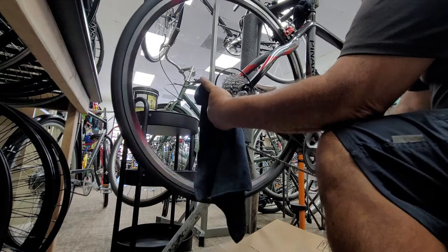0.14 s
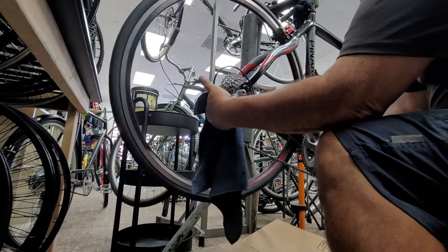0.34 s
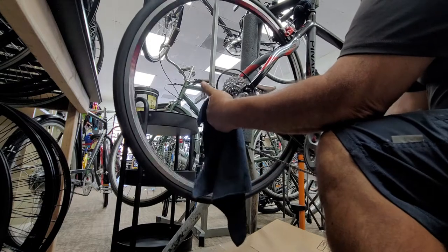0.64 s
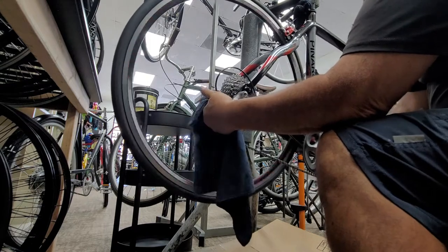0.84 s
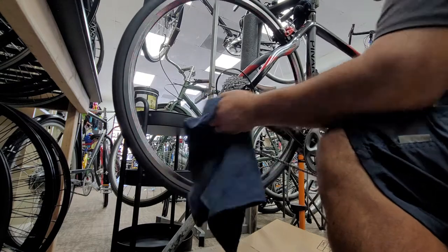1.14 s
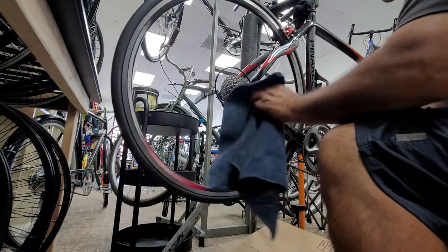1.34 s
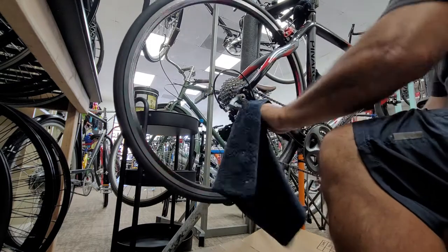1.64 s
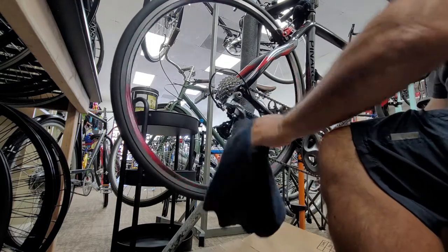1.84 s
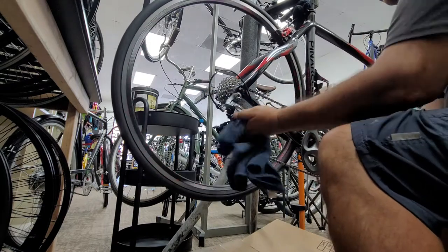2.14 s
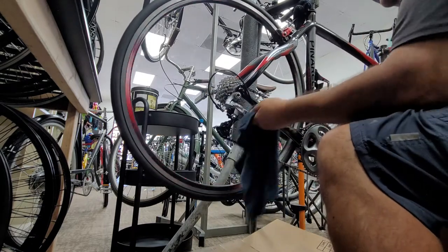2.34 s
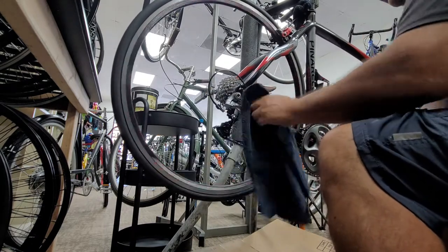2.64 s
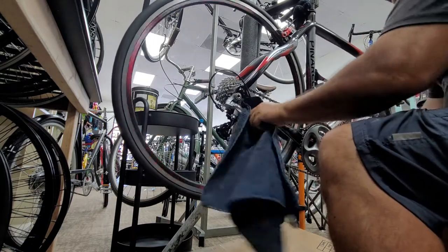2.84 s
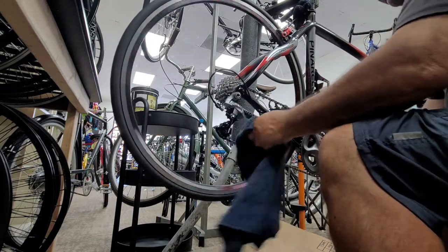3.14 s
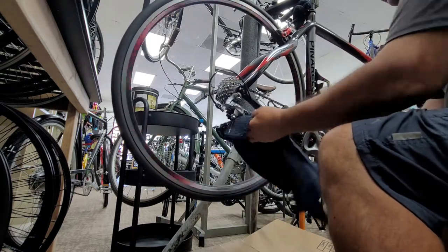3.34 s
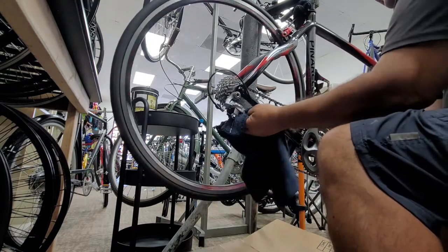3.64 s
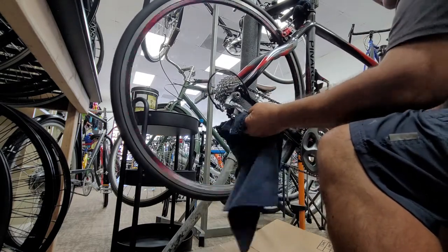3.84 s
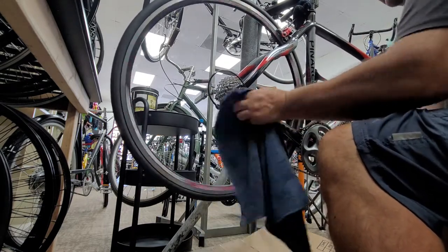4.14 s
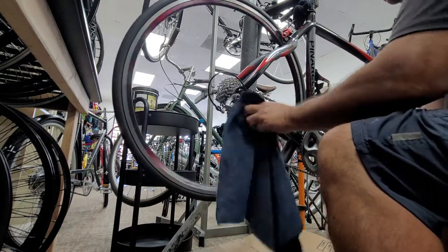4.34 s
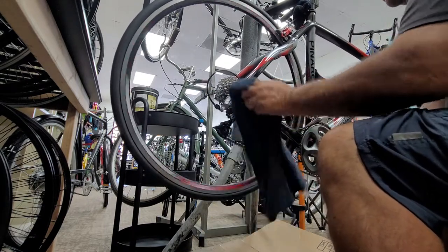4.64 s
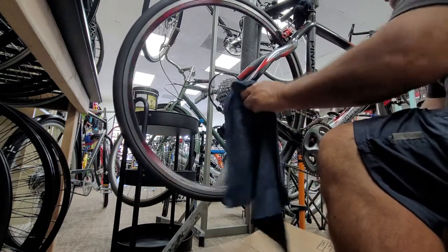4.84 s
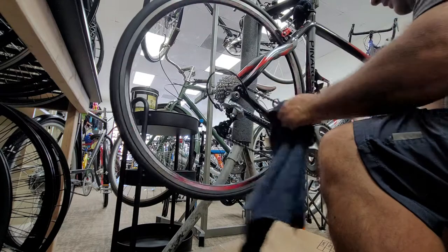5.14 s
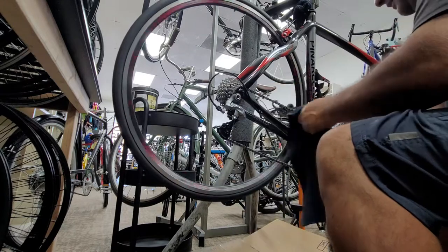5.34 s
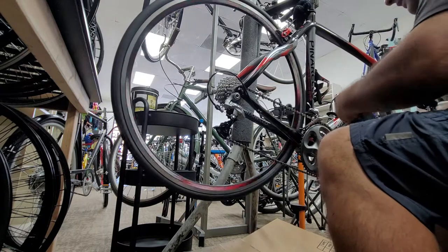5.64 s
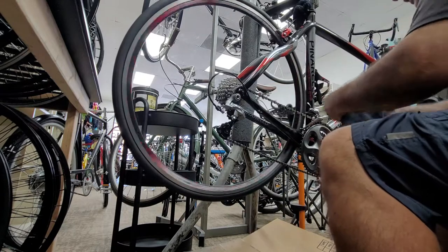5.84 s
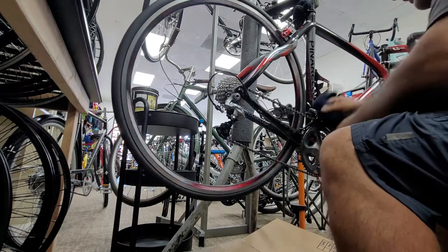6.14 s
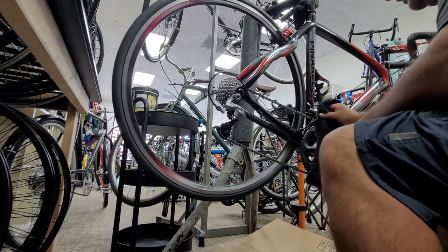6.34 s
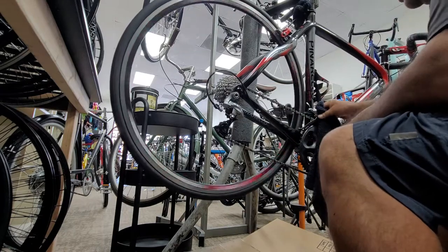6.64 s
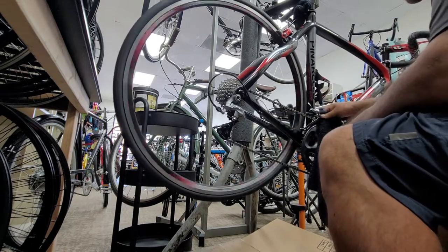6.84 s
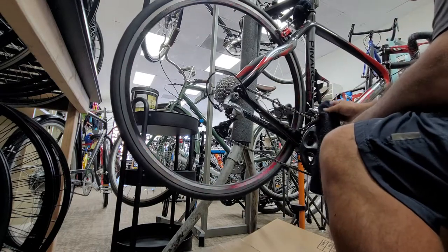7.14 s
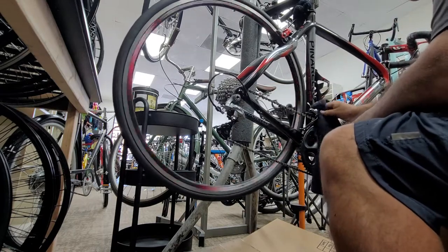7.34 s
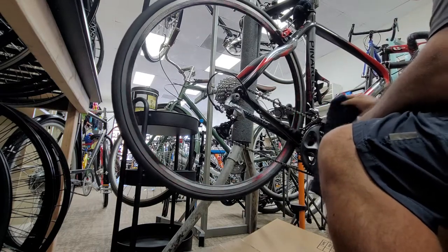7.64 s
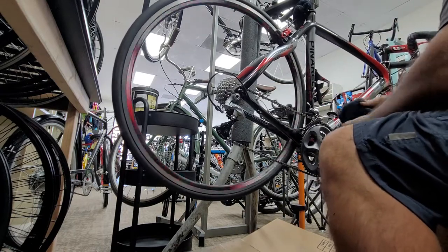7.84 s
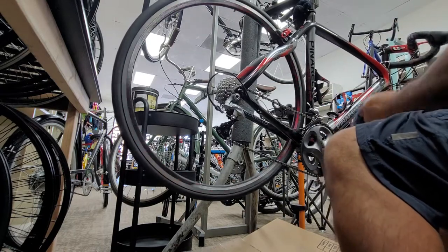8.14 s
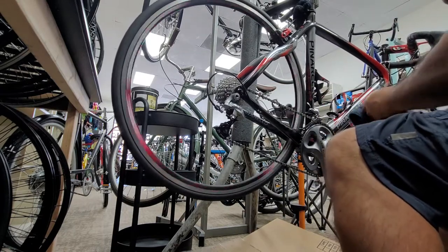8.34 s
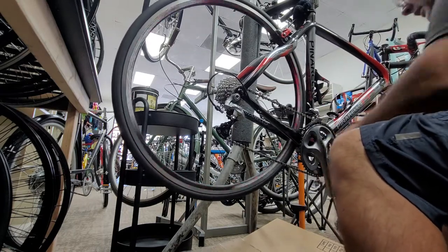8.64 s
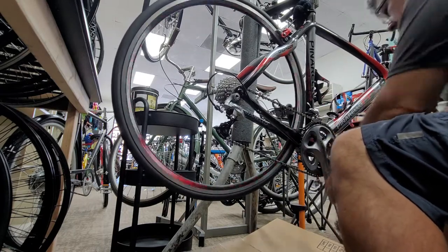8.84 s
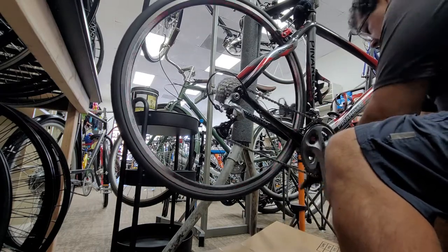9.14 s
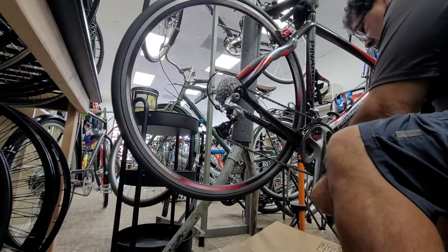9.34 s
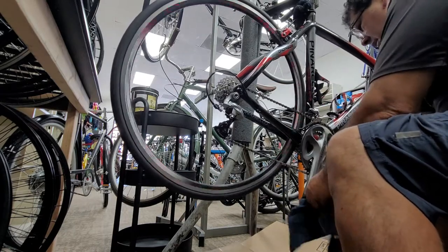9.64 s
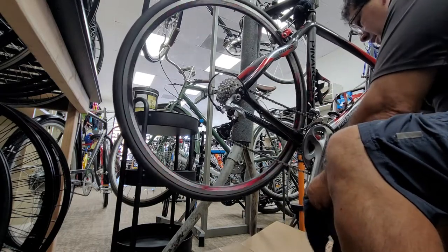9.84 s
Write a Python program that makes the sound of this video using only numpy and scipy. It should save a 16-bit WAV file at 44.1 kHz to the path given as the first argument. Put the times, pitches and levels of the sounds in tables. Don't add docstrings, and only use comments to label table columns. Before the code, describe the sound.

Close, bright ticking buzz of a coasting rear wheel, about sixty clicks a second, slowing slightly, with faint cloth scuffs and low room rumble.

```python
import sys
import numpy as np
from scipy import signal
from scipy.fft import rfft, irfft
from scipy.io import wavfile
from scipy.ndimage import uniform_filter1d

SR = 44100
rng = np.random.default_rng(int(sys.argv[2]) if len(sys.argv) > 2 else 0)


def file_out(sig):
    cols = np.atleast_2d(sig).T
    lim = np.clip(cols, -1, 1)
    pcm = np.round(lim * 32767).astype(np.int16)
    wavfile.write(sys.argv[1], SR, pcm)


def how_loud(loudness_db):
    steps = np.asarray(loudness_db, float) / 20
    return 10 ** steps


N = 440118

# (time [s], peak level [dB], drone pitch [Hz], spread [s])
VEHICLES = [(0, -53.5, 37, .2), (.95, -41, 38.4, 0.074), (1.5, -46, 40.44, 0.46), (2.0, -38, 43, 0.19),
            (2.64, -43, 45, 0.13), (3.5, -52, 40.3, 0.33), (4.45, -53, 41, 0.31), (6.15, -57, 35.1, 0.33),
            (7.34, -56, 40, .08), (8.3, -50, 45.3, .2), (9.0, -53, 41, 0.14), (9.67, -56, 42.3, 0.24)]
LULL_DB, LULL_HZ = -60, 40
# (frequency [Hz], level [dB per Hz])
AIR_SPECTRUM = [(12, -40), (20, 1), (48, -7.5), (80, 4), (97, -5), (128, -9.5), (147, -13.5), (175, -19.5),
                (210, -15.5), (247, -23.5), (309, -19), (490, -27.5), (700, -39.5), (910, -49),
                (1540, -120)]
# (frequency [Hz], level [dB per Hz])
HISS_SPECTRUM = [(25, -10.0), (45, -34), (600, -23), (1500, -32.5), (16000, -30)]
# (frequency [Hz], side minus mid [dB])
AIR_WIDTH = [(60, -16), (110, -12), (200, -7.5), (380, -0.5), (700, -2), (1290, 0), (2380, -11), (4400, -2),
             (8120, 0), (15000, 0)]
# (time [s], rise [dB], spread [s])
VENT_GUSTS = [(.4, 2.5, 0.5), (2.7, 1, 0.4), (3.08, 6, .08), (3.56, 6, 0.13), (4.2, 5, .12),
              (4.8, 1.5, 0.12), (5.8, 2.5, 0.37), (7.05, 6, 0.17), (7.6, 3.5, 0.078), (8.3, 0.5, .1),
              (8.8, 4, 0.11)]
AIR_DB, CALM_DB = -46, -1
MAINS_HZ, MAINS_DB = 121.9, -56

# (time [s], peak level [dB], contact [s])
STOOL_BLOWS = [
    (5.559, -56, .0004),
    (5.576, -31, 0.0016),
    (8.531, -46, 0.0011),
]
# (frequency [Hz], level [dB], decay time T60 [s])
STOOL_MODES = [(195.5, -2, 0.67), (261, -3, 0.26), (390, -2, 0.23), (462, -3, 0.1), (640, -10, 0.074),
               (836, -10, .07), (1152, 3, .06), (2000, -14, .04)]
# (time [s], peak level [dB], centre [Hz], width [Hz], length [s])
SCUFF_EVENTS = [(.43, -48.5, 523, 68, 0.15), (0.424, -48, 1430, 160, 0.066), (.45, -46.5, 920, 550, 0.056),
                (4.2, -47, 780, 150, 0.14), (4.021, -48, 474, 150, 0.11), (4.5, -52, 650, 230, 0.084),
                (4.39, -49, 480, 130, 0.097), (5.558, -36, 950, 1260, 0.068), (5.591, -43, 260, 48, .14),
                (5.577, -48.5, 398, 200, 0.13), (3, -62, 54, 4, 1.3), (2.5, -54, 140, 2.8, 1.2),
                (3.189, -55, 745, 15, 0.44), (9.4, -53, 370, 230, 0.068), (9.921, -49, 590, 790, 0.17)]
ROOM_T60_S, ROOM_DB = 0.28, -6
PORT_LAG = 18

# (time [s], travel [teeth], spread [s])
CRANK_NUDGES = [(0.034, -0.279, 0.0524), (0.2574, 3.896, 0.0813), (0.3417, 2.969, 0.0471),
                (0.392, -0.687, 0.1035), (0.869, -3.858, 0.1164), (1.1824, -3.692, 0.0941),
                (1.9323, -1.916, 0.108), (1.9865, 2.421, 0.1617), (2.4373, 0.234, 0.0268),
                (5.0286, 1.469, 0.1933), (5.269, 0.871, 0.0564), (5.4942, -0.51, 0.0322),
                (9.228, 1.972, 0.0464), (9.3123, 4.705, 0.0634), (9.4254, 3.757, 0.1048),
                (9.6325, -2.844, 0.0489), (9.6646, 4.654, 0.0788)]
TEETH = 30
START_TEETH, COAST_TEETH_S = -.2185, 67.3316
DRAG_TEETH_S2, EASE_TEETH_S3 = 1.4739, .0248
# (near 2.8 kHz [dB], near 4.5 kHz [dB], above 6 kHz [dB])
PLAIN_TOOTH_DB = (.1, 1.23, 0.45)
# (tooth [index], near 2.8 kHz [dB], near 4.5 kHz [dB])
WORN_TEETH = [(0, 3.5, -3.3), (1, -2, 2), (2, -4, -3.7), (4, 1, -0.3), (5, 2, 1), (6, 1.8, -5),
              (7, -1.7, 5), (8, -5.5, 1.2), (9, 0.4, 0.1), (10, -6, 4.2), (11, -5.5, -7), (14, -1, 4.5),
              (15, -2.5, 2.5), (18, -0.5, -1), (22, -0.5, 1.5), (23, -4.5, 2.5), (24, 0, 2.5), (29, 4, 2.3)]
# (near 2.8 kHz [dB], near 4.5 kHz [dB], above 6 kHz [dB])
SEATING_DB = (1.4, 1.6, 0.6)
DRIFT_TURNS = 32
# (time [s], level [dB])
BLOW_STRENGTH = [(0, 0.4), (1.2, 0.1), (2.5, 0.9), (5.2, 0.6), (5.6, 1.4), (9.1, 1.4), (9.98, 1.9)]
# (frequency [Hz], level [dB per Hz])
WHEEL_BED = [(320, -100), (550, -41), (670, -37), (749, -8.5), (1370, -22.5), (2060, -6.5), (2270, -8),
             (2770, 2.5), (3510, -8.5), (4280, -7.5), (6160, -8), (9530, -6.5), (11800, -10.5), (14900, -2),
             (15800, -23)]
# (frequency [Hz], width [Hz], level [dB])
WHEEL_MODES = [(735, 35, -14.5), (800, 29, -21), (899, 65, -9), (1171, 21, -18), (1538, 250, -17),
               (1957, 48, -8.5), (2132, 50, -5), (2357, 33, -4), (2480, 58, -12), (2670, 83, -3.5),
               (2814, 31, -0.5), (3044, 204, -5.5), (3860, 140, -10.5), (4300, 260, -11.5),
               (4930, 210, -14), (7236, 130, -10), (8250, 110, -10), (9520, 460, -10), (10650, 470, -10.5),
               (14770, 400, -7), (15700, 240, -7)]
# (frequency [Hz], left minus right [dB])
PORT_FACING = [(60, 10), (110, 9), (200, 4), (380, -1), (700, -6), (1290, -3.5), (2380, 0.5), (4400, 0.5),
               (8120, 3.0), (15000, 6)]
FRAME_LATE_S, RIM_LATE_S = .0052, 0.00157
RIM_HZ, RIM_WIDTH_HZ, RIM_DB, RIM_SWING_DB, RIM_FACES_TOOTH = 2110, 200, 18.5, 5.5, 1.2
SNAP_S, SNAP_DB = 0.00016, 2.5


def on_log(hz, table):
    points = np.array(table, float)
    return np.interp(np.log(np.maximum(hz, 1)), np.log(points[:, 0]), points[:, 1])


def level(x, db):
    return x * how_loud(db) / np.sqrt(np.mean(x ** 2))


def bell(s, spread):
    return np.exp(-.5 * ((np.arange(N) / SR - s) / spread) ** 2)


def shaped(gain_db):
    gain = how_loud(gain_db(np.fft.rfftfreq(N, 1 / SR)))
    return irfft(rfft(rng.standard_normal(N)) * gain, N)


def causal(gain):
    cepstrum = irfft(np.log(gain))
    cepstrum[1:len(gain) - 1] *= 2
    cepstrum[len(gain):] = 0
    return irfft(np.exp(rfft(cepstrum)))


def through(x, response):
    return signal.fftconvolve(x, response, axes=-1)[..., :N]


def ports(noise, shared):
    common = noise[..., 2, :]
    both = np.stack([common, np.roll(common, PORT_LAG, axis=-1)], axis=-2)
    return np.sqrt(1 - shared) * noise[..., :2, :] + np.sqrt(shared) * both


def traffic():
    lull = how_loud(LULL_DB) ** 2
    power = [how_loud(db) ** 2 * bell(s, spread) ** 2 for s, db, _, spread in VEHICLES]
    total = lull + sum(power)
    hz = (lull * LULL_HZ + sum(p * row[2] for p, row in zip(power, VEHICLES))) / total
    return hz, np.sqrt(total)


def workshop():
    def air_db(hz):
        return np.maximum(on_log(hz, AIR_SPECTRUM), on_log(hz, HISS_SPECTRUM))

    mid = shaped(air_db)
    side = shaped(lambda hz: air_db(hz) + np.minimum(on_log(hz, AIR_WIDTH), 0))
    deep = signal.sosfiltfilt(signal.butter(2, [58, 112], "bandpass", fs=SR, output="sos"), mid)
    swell_db = CALM_DB + sum(db * bell(s, spread) for s, db, spread in VENT_GUSTS)
    mid = mid + deep * (how_loud(swell_db) - 1)
    air = level(np.array([mid + side, mid - side]), AIR_DB)
    mains = how_loud(MAINS_DB) * np.sqrt(2) * np.sin(2 * np.pi * MAINS_HZ * np.arange(N) / SR)
    hz, size = traffic()
    flutter = 1 + 0.34 * level(shaped(lambda f: -20 * np.log10(1 + (f / 2.1) ** 2)), 0)
    drone = size * how_loud(1.0) * flutter * np.sin(2 * np.pi * np.cumsum(hz) / SR)
    return air + mains + drone * how_loud(np.array([[-1.5], [1.5]]))


def stool():
    t = np.arange(SR // 2) / SR
    ring = np.zeros(len(t))
    for hz, db, t60 in STOOL_MODES:
        ring += how_loud(db) * np.sin(2 * np.pi * hz * t) * np.exp(-np.log(1000) * t / t60)
    push = np.zeros((2, N))
    for s, db, contact in STOOL_BLOWS:
        blow = np.hanning(int(contact * SR) + 3)
        at = int(s * SR)
        push[:, at:at + len(blow)] += np.outer(how_loud(db + np.array([-5.0, -3.0])), blow / blow.sum())
    return through(push, ring[None])


def scuffs():
    out = np.zeros((2, N))
    for s, db, hz, width, length in SCUFF_EVENTS:
        size = int(2 * length * SR)
        edges = [max(hz - width / 2, 50), hz + width / 2]
        band = signal.butter(2, edges, "bandpass", fs=SR, output="sos")
        grit = signal.sosfilt(band, rng.standard_normal((2, size)))
        u = np.arange(size) / (length * SR)
        swell = level(grit, db) * 4 * u * np.exp(-4 * u) * np.e
        at = int(s * SR)
        out[:, at:at + size] += swell[:, :N - at]
    return out


def room_echo():
    t = np.arange(3 * SR // 8) / SR
    decay = np.exp(-np.log(1000) * t / ROOM_T60_S) * (t > .006)
    tail = ports(rng.standard_normal((3, len(t))), 0.23) * decay
    tail = signal.lfilter([1], [1, -.4], tail)
    return tail * how_loud(ROOM_DB) / np.sqrt(np.sum(tail ** 2, axis=1, keepdims=True))


def click_times():
    t = np.arange(N) / SR
    teeth = START_TEETH + COAST_TEETH_S * t - DRAG_TEETH_S2 * t ** 2 / 2 + EASE_TEETH_S3 * t ** 3 / 6
    for s, moved, spread in CRANK_NUDGES:
        teeth = teeth - moved * (1 + np.tanh((t - s) / spread)) / 2
    return np.interp(np.arange(int(teeth[-1]) + 1), teeth, t)


def wear_db(count):
    db = np.tile(np.array(PLAIN_TOOTH_DB, float), (TEETH, 1))
    worn = np.array(WORN_TEETH)
    db[np.round(worn[:, 0]).astype(int), :2] += 1.13 * worn[:, 1:]
    tooth = np.arange(count) % TEETH
    seat = rng.standard_normal((2, TEETH, 3))
    drift = 2 * np.pi * np.arange(count)[:, None] / (TEETH * DRIFT_TURNS)
    seating = np.cos(drift) * seat[0][tooth] + np.sin(drift) * seat[1][tooth]
    return db[tooth] + np.array(SEATING_DB) * seating


def pawl_envelope(t):
    since = np.maximum(t - 0.0022 * rng.random((TEETH, 3, 1)), 0)
    shape = (1 - np.exp(-since / 0.00049)) * (np.exp(-since / 0.0011) + np.exp(-since / 0.013))
    shape = shape + how_loud(SNAP_DB) * since / SNAP_S * np.exp(-since / SNAP_S)
    return shape.mean(axis=1, keepdims=True)


def rattles(count, t):
    tooth = np.arange(count) % TEETH
    own = rng.standard_normal((TEETH, 3, len(t)))
    fresh = rfft(rng.standard_normal((count, 2, len(t))))
    hz = np.fft.rfftfreq(len(t), 1 / SR)
    middle = 1 / (1 + (hz / 3500.) ** 12)
    top = 1 / (1 + (5600. / (hz + 1)) ** 12)
    related = uniform_filter1d(ports(own, 0.78), size=3, axis=0, mode="wrap")
    rings = rfft(related * np.sqrt(3))
    signature = np.sqrt(middle) * rings + np.sqrt(1 - middle) * rfft(ports(own, 0.32))
    shape = pawl_envelope(t)
    lobes = uniform_filter1d(rng.standard_normal((TEETH, 2, len(hz))), size=3, axis=0, mode="wrap")
    lobes = uniform_filter1d(lobes, size=30)
    lobes = how_loud((2.26 + 0.73 * top) * lobes / lobes.std())
    power = np.abs(rfft(irfft(signature * lobes, len(t)) * shape).sum(axis=1)) ** 2
    ranges = np.array([middle, np.maximum(1 - middle - top, 0), top])
    core = ranges * np.array([hz > 2300, hz > 0, hz > 0])
    energy = power @ core.T
    range_db = wear_db(count) - 10 * np.log10(energy / energy.mean(axis=0))[tooth]
    wear_gain = how_loud(range_db @ ranges / (1 + (2150.0 / (hz + 1)) ** 8))[:, None]
    low_cut = np.sqrt(1 / (1 + (1630.0 / (hz + 1)) ** 8) + 0.02)
    colour = lobes[tooth] * wear_gain * low_cut
    clicks = signature[tooth] + (0.5 + 0.27 * top) * fresh
    return irfft(clicks * colour, len(t)) * shape[tooth]


def wheel_body():
    hz = np.linspace(0, SR / 2, 4097)
    power = how_loud(on_log(hz, WHEEL_BED) - 7.0) ** 2
    for centre_hz, width, db in WHEEL_MODES:
        power = power + how_loud(db) ** 2 / (1 + (2 * (hz - centre_hz) / width) ** 2) ** 1.33
    facing_db = on_log(hz, PORT_FACING) / 2
    return np.array([causal(np.sqrt(power) * how_loud(sign * facing_db) + 1e-5) for sign in (1, -1)])


def at_both_ports(response):
    return np.array([response, 0.67 * np.roll(response, PORT_LAG)])


def thud_and_rim(samples, blow, angle):
    swing_db = RIM_SWING_DB * np.cos(angle - 2 * np.pi * RIM_FACES_TOOTH / TEETH)
    frame_strikes, rim_strikes = np.zeros((2, 1, N))
    frame_strikes[0, samples] = blow * (1 + 0.05 * np.sin(angle + 4.9))
    rim_strikes[0, samples] = blow * how_loud(swing_db)
    hz = np.linspace(0, SR / 2, 513)
    thud = causal(how_loud(21.0) / np.sqrt(1 + (hz / 1430.0) ** 6))
    thud = 0.13 * thud + np.roll(thud, int(FRAME_LATE_S * SR))
    rim = causal(how_loud(RIM_DB) / (1 + (2 * (hz - RIM_HZ) / RIM_WIDTH_HZ) ** 4))
    rim = np.roll(rim, int(RIM_LATE_S * SR))
    return through(frame_strikes, at_both_ports(thud)) + through(rim_strikes, at_both_ports(rim))


def ratchet():
    times = click_times() + .0001
    angle = 2 * np.pi * np.arange(len(times)) / TEETH
    times = times + .00012 * np.sin(angle + 1.2) + .00003 * rng.standard_normal(len(times))
    samples = (times * SR).astype(int)
    t = np.arange(3072) / SR
    blow = how_loud(np.interp(times, *np.transpose(BLOW_STRENGTH)))
    buzz = np.zeros((2, N + len(t)))
    for at, size, rattle in zip(samples, blow, rattles(len(times), t)):
        buzz[:, at:at + len(t)] += size * rattle
    knock = thud_and_rim(samples, blow, angle)
    return level(through(buzz[:, :N] + knock, wheel_body()), -27.5)


def scene():
    wheel = ratchet()
    blows = stool() + scuffs()
    echo = through(wheel + how_loud(-7.0) * blows, room_echo())
    return wheel + blows + echo + workshop()


def band_limit(x):
    return signal.sosfilt(signal.butter(12, 16850, fs=SR, output="sos"), x)


def record(dry):
    top_cut = signal.ellip(10, .3, 70, 15850, fs=SR, output="sos")
    return band_limit(signal.sosfilt(top_cut, dry))


dry = scene()
out = record(dry)
file_out(out)
```